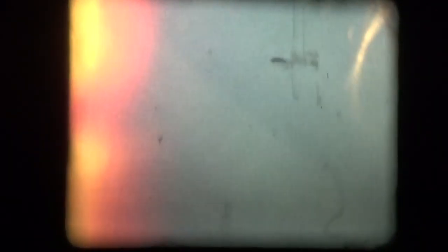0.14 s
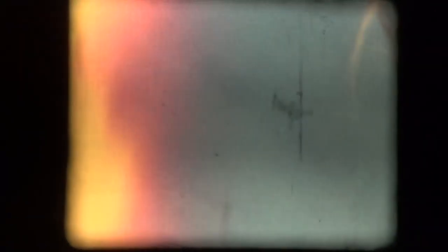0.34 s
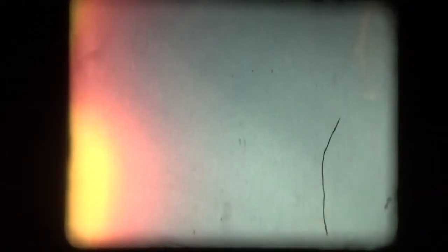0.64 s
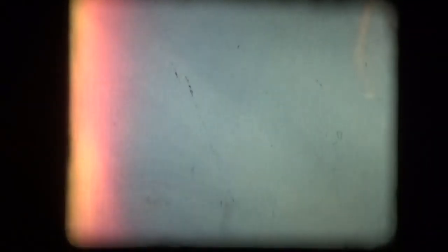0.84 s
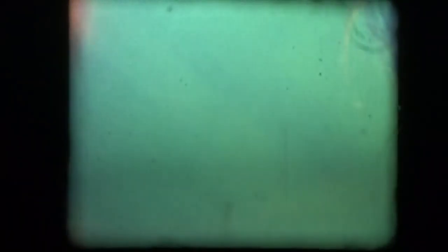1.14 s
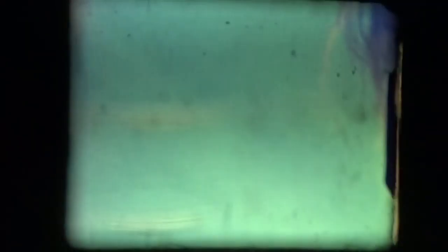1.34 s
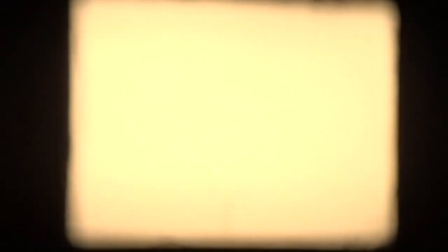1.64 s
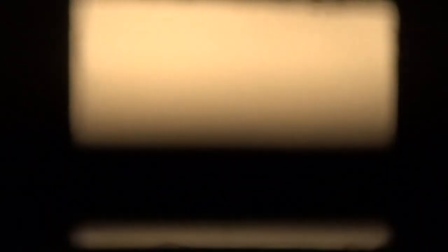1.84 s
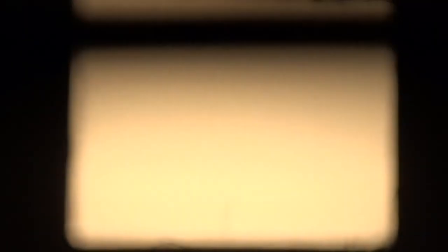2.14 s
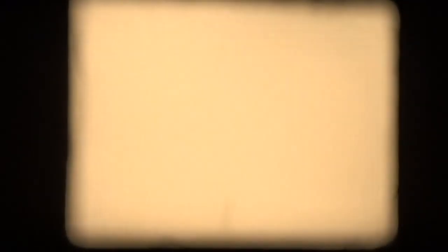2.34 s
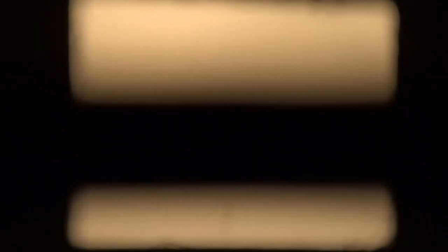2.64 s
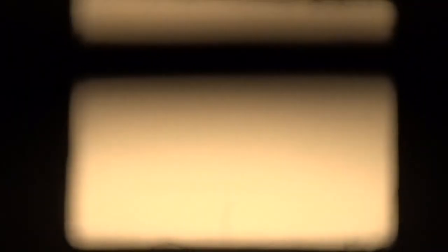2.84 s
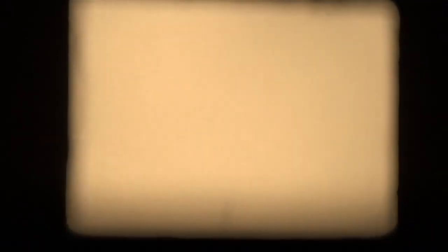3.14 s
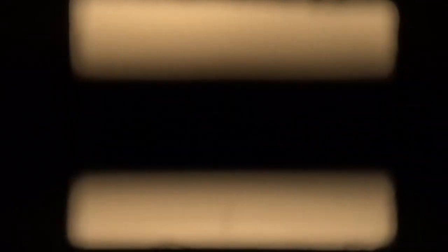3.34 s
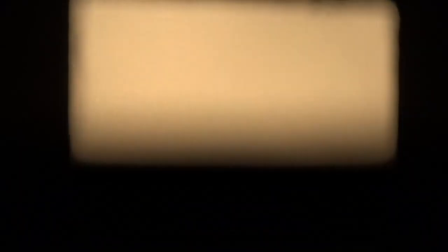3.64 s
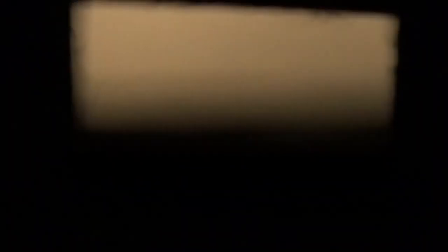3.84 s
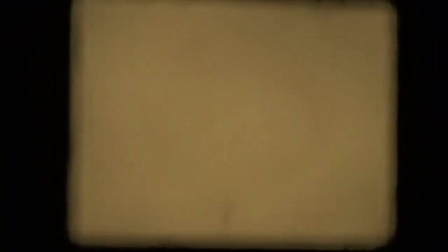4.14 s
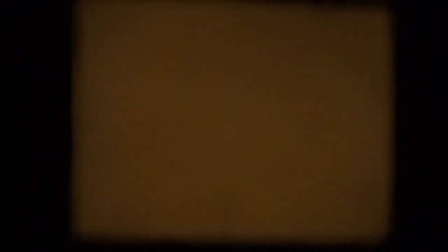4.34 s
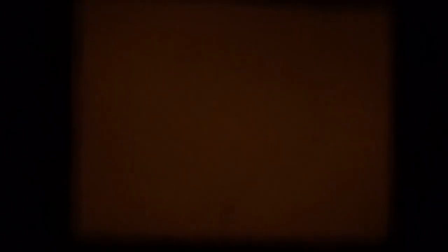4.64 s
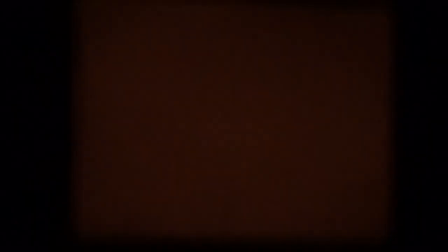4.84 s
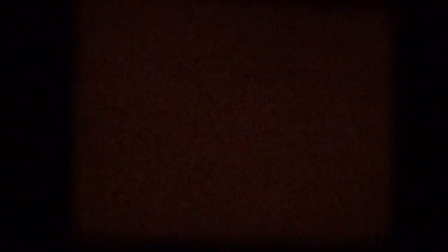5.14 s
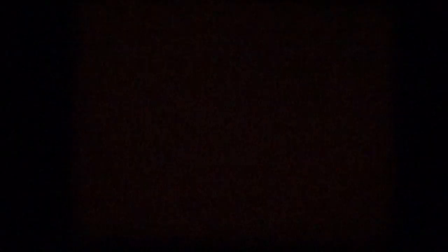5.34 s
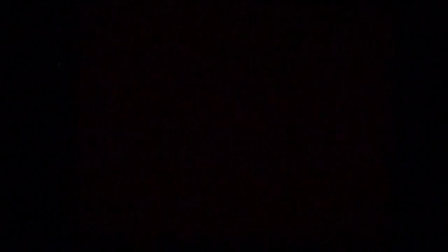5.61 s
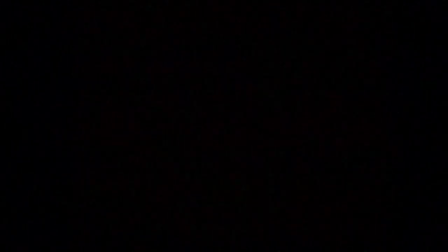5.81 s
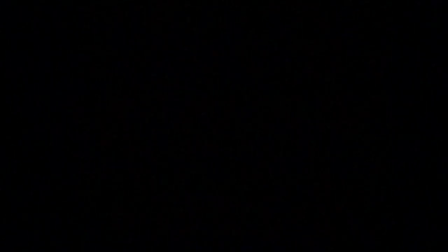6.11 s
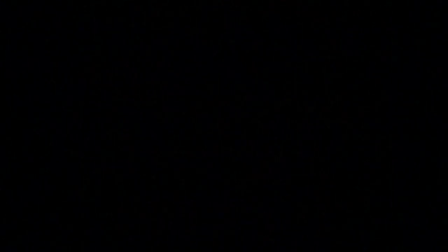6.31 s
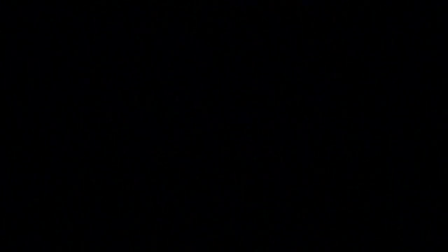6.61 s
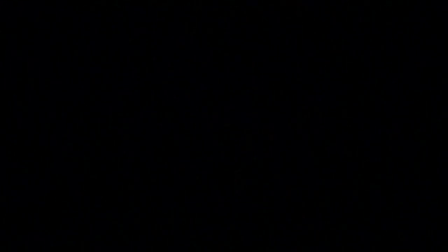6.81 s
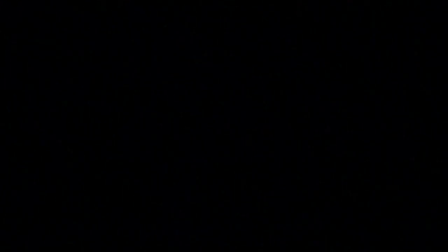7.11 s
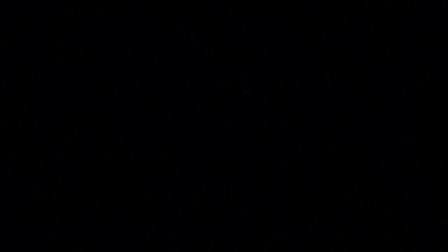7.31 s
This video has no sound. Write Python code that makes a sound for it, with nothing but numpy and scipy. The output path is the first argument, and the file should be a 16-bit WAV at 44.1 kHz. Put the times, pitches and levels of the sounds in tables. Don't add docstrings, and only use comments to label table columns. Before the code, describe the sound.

Steady mechanical roar with fast clicking, then small steel clinks and scrapes, a motor switched off and winding down, quiet rustling and close knocks.

```python
import sys
import numpy as np
from scipy import signal
from scipy.fft import rfft, irfft, next_fast_len
from scipy.io import wavfile
from scipy.ndimage import uniform_filter1d, map_coordinates

SR = 44100
rng = np.random.default_rng(int(sys.argv[2]) if len(sys.argv) > 2 else 0)


def level_to_linear(level):
    exponent = np.asarray(level, float) / 20
    return 10 ** exponent


def unload_wav(signal):
    wavfile.write(
        sys.argv[1],
        SR,
        np.round(np.clip(np.atleast_2d(signal).T, -1, 1) * 32767).astype(np.int16),
    )


N = 329427


def unit(x):
    return x / np.sqrt(np.mean(x ** 2) + 1e-20)


def curve(points, t):
    return np.interp(t, *np.transpose(points))


def along(points, hz):
    f, v = np.transpose(points)
    return np.interp(np.log(hz + 1), np.log(f + 1), v)


def between(start_s, end_s, fade_s):
    t = np.arange(N) / SR
    return np.clip(np.minimum(t - start_s, end_s - t) / fade_s, 0, 1)


def wobble(rate):
    steps = np.arange(0, N + 16, 16)
    knots = rng.standard_normal(int(N * rate / SR) + 4)
    return np.interp(np.arange(N), steps, map_coordinates(knots, [steps * rate / SR]))


def filtered(x, response):
    m = next_fast_len(N + 8192)
    return irfft(rfft(x, m) * response(np.fft.rfftfreq(m, 1 / SR)), m)[..., :N]


def shaped(response):
    return unit(filtered(rng.standard_normal(N), response))


def band(lo_hz, hi_hz):
    return shaped(lambda f: 1 / (1 + (lo_hz / (f + 1)) ** 8) / (1 + (f / hi_hz) ** 8))


def coloured(spectrum):
    return shaped(lambda f: level_to_linear(along(spectrum, f)))


def patchy(x, depth_db):
    z = signal.stft(x, nperseg=256)[2]
    field = uniform_filter1d(rng.standard_normal(z.shape), size=3, axis=0)
    field = uniform_filter1d(field, size=20, axis=1)
    return signal.istft(z * level_to_linear(depth_db * unit(field)), nperseg=256)[1][:N]


def swell_decay(t, db, rise_s, t60_s):
    return level_to_linear(db - 60 * np.maximum(t - rise_s, 0) / t60_s) * np.minimum(t / rise_s, 1)


def bursts(rows):
    env, t = np.zeros(N + SR), np.arange(SR // 3) / SR
    for s, db, rise_s, t60_s in rows:
        env[round(s * SR):][:len(t)] += swell_decay(t, db, max(rise_s, 2e-4), max(t60_s, 5e-3))
    return env[:N]


def ports(one, other):
    # f/Hz, left-right likeness
    alike = [(60, 0.17), (150, 0.907), (380, 0.94), (950, 0.903), (2380, 0.83), (5980, 0.8), (15000, 1)]
    # f/Hz, left minus right/dB
    left = [(60, -7.5), (180, -1), (550, -2.5), (1650, -1), (4970, -0.5), (15000, 0.5)]
    # f/Hz, left leads by/rad
    lead = [(0, 0.42), (780, 0.37), (2240, 0.164), (6550, 0.07), (6800, 0.3), (7750, 0.34), (15900, 0.0)]
    turn = lambda f: np.arccos(np.clip(along(alike, f), -1, 1)) / 2
    mid, side = filtered(np.array([one, other]), lambda f: np.array([np.cos(turn(f)), np.sin(turn(f))]))
    half = lambda f: level_to_linear(along(left, f) / 2) * np.exp(.5j * along(lead, f))
    return filtered(np.array([mid + side, mid - side]), lambda f: np.array([half(f), 1 / half(f)]))


def quiet_room():
    # f/Hz, density/dB per Hz
    spectrum = [(15, -38), (25, -21.5), (49, -1), (191, -11), (264, 3.5), (396, -13), (506, -4.5),
                (3860, -13), (11100, -14), (14900, -19), (16200, -17.5)]
    common_part = coloured(spectrum) * level_to_linear([[-.35], [.35]])
    pair = np.array([coloured(spectrum), coloured(spectrum)])
    unrelated = filtered(pair, lambda f: 1 / (1 + (f / 7000) ** 4))
    return level_to_linear(-59) * (coloured(spectrum) * 0 + common_part + level_to_linear(1.5) * unrelated * level_to_linear([[-.35], [.35]]))


def cloth():
    strokes = [(5.05, 1, 0.51, -52.5, -5), (5.28, -0.08, 0.022, -36, -17), (5.257, -0.25, 0.0203, -37, -15),
               (5.3, 0.2, 0.15, -57, -25.5), (5.87, .13, .09, -55, 6), (5.96, .09, .07, -53, 5),
               (6.2, .12, .16, -58, 0), (6.5, 0.28, .05, -59.5, 4.5), (6.67, 0.3, 0.057, -69.5, 8.5),
               (7.12, 0.1, 0.071, -50.5, -9), (7.279, .015, .01, -53, -8.5),
               (7.345, 0.0733, 0.065, -38, -9), (7.44, 0.02, .06, -44, -2)]
    # f/Hz, density/dB per Hz
    swish_spectrum = [(2940, -14.5), (5000, -4), (5440, -4.5), (8550, -3.5), (11000, 2), (12500, -1),
                      (14500, -10), (16200, -16)]
    # f/Hz, density/dB per Hz
    rub_spectrum = [(40, -50), (200, -6), (600, -7), (1150, -2.5), (1980, -1.5), (2890, -4.5), (8000, -19),
                    (10400, -52)]
    t = np.arange(N) / SR
    rub, swish = np.zeros(N), np.zeros(N)
    for s, swell_s, fade_s, db, swish_db in strokes:
        away = np.where(t < s, (s - t) / max(swell_s, .004), (t - s) / max(fade_s, .004))
        rub += level_to_linear(db - 10 * away ** 1.2)
        swish += level_to_linear(db + swish_db - 11.2 * away ** 1.4)
    fabric = swish * coloured(swish_spectrum) * level_to_linear(0.99 * wobble(55))
    fabric = fabric + rub * patchy(coloured(rub_spectrum), depth_db=2) * level_to_linear(1.71 * wobble(160))
    unsteady = level_to_linear(2.5 * wobble(30) + 2 * wobble(5))
    shuffle = level_to_linear(-65.5) * (t > 4.9) * band(lo_hz=99, hi_hz=456) * unsteady
    return fabric + shuffle


def knocks():
    # t/s, peak/dB, thud/dB, hardness/dB
    contacts = [(7.049, -16, -13, -6.5), (7.069, -31.5, -16.5, 0), (7.106, -39, -6, -6),
                (7.155, -22, -2.5, -24.5), (7.182, -29, -2, -1), (7.195, -38, -24.5, 6.5),
                (7.282, -21, -14, -9), (7.292, -20.5, -22.5, -16.5), (7.306, -27, -17, -10.5),
                (7.318, -26.5, -18, -15.5), (7.441, -19.5, -20, -20), (7.462, -30, -15.5, -1.5)]
    # f/Hz, width/Hz, level/dB
    shell_modes = [(987, 150, 16.5), (1420, 270, -13), (1586, 820, 5), (2345, 700, -13)]
    # t/s, level/dB, edge/dB
    hard_blows = [
        (7.0495, -1, 10),
        (7.157, -16.5, 0),
        (7.172, -2.5, -10),
        (7.2835, -14, -1.5),
        (7.294, -15, -5.5),
        (7.4415, -9, -0.5),
    ]

    def resonance(f, centre_hz, width_hz):
        return 1j * f * width_hz / (centre_hz * centre_hz - f * f + 1j * f * width_hz)

    def shell(f):
        return sum((-1) ** k * level_to_linear(db) * resonance(f, hz, w) for k, (hz, w, db) in enumerate(shell_modes))

    def part(heavy, hard, shift_db, life):
        return bursts([(s, db + heavy * thud_db + hard * hard_db + shift_db, .0007, 0.044 * life)
                       for s, db, thud_db, hard_db in contacts])

    body = part(0, 0, shift_db=-0.5, life=0.92) * shaped(shell)
    thud = part(0.96, 0, shift_db=-3.0, life=4.1) * band(lo_hz=110, hi_hz=520)
    snap = part(0, 0.9, shift_db=1.5, life=0.4) * band(lo_hz=2570, hi_hz=6970)
    tick = part(0, 1.36, shift_db=1.5, life=0.25) * band(lo_hz=6540, hi_hz=13440)
    impulses = np.zeros((2, N))
    for s, db, edge_db in hard_blows:
        impulses[:, round(s * SR)] = -level_to_linear([db - 8, db + edge_db])
    clack = filtered(impulses, lambda f: np.array([shell(f), resonance(f, 2200, 3000)])).sum(0)
    return clack + body + thud + snap + tick


def bumps():
    # t/s, level/dB, centre f/Hz, spread ratio, t60/s
    rows = [(3.867, -17, 2300, 1.63, 0.074), (4.337, -26.5, 3244, 1.1, 0.15),
            (5.023, -38, 1700, 1.5, 0.067), (5.023, -31, 4400, 1.1, 0.065),
            (5.022, -25, 8980, 0.92, 0.0566), (5.164, -28, 1355, 1.9, 0.089),
            (5.165, -36.5, 2170, 1.034, .13), (5.163, -38, 4530, 1.67, .042), (5.38, -46, 1490, 1.4, 0.082),
            (5.42, -50, 4340, 1.4, .08), (5.953, -42.5, 220, 2.26, 0.18), (6.005, -41.5, 254, 2.33, 0.093),
            (6.461, -41.5, 383, 2.2, 0.32), (6.463, -47.5, 1500, 3, 0.4), (6.466, -44, 2340, 1.1, 0.127),
            (7.170, -13, 637, 2.52, 0.066), (7.19, -45.5, 230, 2.96, 0.23), (7.292, -28.5, 186, 1.17, 0.19),
            (7.3, -50, 3470, 1.46, 0.343), (7.44, -41, 230, 2.8, 0.36), (6.462, -51, 110, 2.48, 0.33),
            (7.284, -36.5, 120, 1.9, 0.23), (7.053, -47, 130, 1.1, 0.16), (7.293, -26, 970, 1.2, 0.08),
            (7.294, -32, 2180, 0.98, .11), (7.294, -39.5, 3270, 1.04, 0.27),
            (7.35, -38.5, 1690, 1.08, 0.16), (7.34, -40, 950, 1.12, 0.213),
            (7.4402, -24, 1100, 1.45, 0.046), (7.441, -36, 2330, 1.12, .05), (7.442, -38, 3867, 0.87, .15),
            (7.462, -36, 2300, 1.3, .08), (5.164, -43.5, 6685, 0.88, .04), (5.277, -36, 1600, 1.2, .05)]
    out, t = np.zeros(N + SR), np.arange(SR // 3) / SR
    f = np.fft.rfftfreq(len(t), 1 / SR) + 1
    for s, db, hz, spread, t60_s in rows:
        colour = level_to_linear(-9 * (np.log(f / hz) / np.log(max(spread, 1.02))) ** 2)
        noise = unit(irfft(rfft(rng.standard_normal(len(t))) * colour, len(t)))
        out[round(s * SR):][:len(t)] += swell_decay(t, db, 0.027 * t60_s, t60_s) * noise
    return out[:N]


def carried_song():
    # t/s, level/dB
    song_db = [(3.42, -45), (3.524, -34), (3.546, -53), (4.442, -43), (4.526, -46), (4.664, -37),
               (4.722, -52.5), (4.756, -38), (4.93, -65.5)]
    t = np.arange(N) / SR
    level = level_to_linear(curve(song_db, t) - 2 + 3 * wobble(30)) * between(song_db[0][0], song_db[-1][0], .04)
    return level * np.sin(2 * np.pi * 4694 * t + .7 * wobble(40))


def jingle():
    # t/s, peak/dB, t60/s, weight of the part/dB
    taps = [(0.4814, -20.5, .045, -11), (0.5814, -28.5, 0.056, -17), (2.438, -10.5, 0.107, -16.5),
            (2.495, -29, .039, -24), (2.9882, -12, 0.05, -11), (3.145, -23, 0.07, -6.5),
            (3.2153, -18, 0.103, -10.5), (3.3932, -23, .04, -21), (3.4154, -23, 0.081, -3),
            (3.4272, -18, 0.24, -17), (3.472, -13, 0.11, -13), (3.4994, -33, 0.18, 2.5),
            (3.538, -23.5, 0.28, -4), (3.571, -12, 0.07, -13), (3.69, -20, 0.089, -8),
            (3.7863, -18, 0.046, -24), (3.8677, -17, 0.047, -8.5), (3.8894, -18, .049, -25),
            (3.955, -24, 0.025, 5.5), (3.975, -15, 0.071, -11), (4.053, -15, 0.037, -3),
            (4.1305, -22, 0.072, -15), (4.2197, -17.5, 0.029, -1), (4.261, -13, 0.0445, -1),
            (4.337, -11, 0.073, -21.5), (4.3546, -17, 0.047, -10), (4.457, -33, 0.028, -4.5),
            (4.61, -20, 0.072, -7.5), (4.7415, -14.5, 0.047, -12.5), (5.023, -20.5, 0.034, -7),
            (5.028, -24, 0.033, -10), (5.062, -39, .06, 0), (3.589, -24, .04, -15),
            (3.657, -23, 0.037, -15), (3.74, -34, .08, -8.5), (3.8149, -23, 0.036, -15),
            (3.834, -22, .04, -7), (3.995, -19, .04, -10), (4.01, -25, 0.032, -6.5),
            (4.1626, -25, .05, -12), (4.19, -25, .04, -10), (4.245, -26, .05, 1.5), (4.328, -18, .04, -25),
            (4.3751, -15.5, 0.048, -13), (4.425, -33, 0.035, -10.5), (4.644, -21, .05, -8)]
    # t/s, peak/dB, rise/s, t60/s, weight/dB
    scrapes = [(.002, -17.5, 0.0078, 0.238, -11.5), (.556, -11.5, 0.0175, 0.092, -17),
               (2.445, -22.5, 0.0132, 0.31, -22), (2.992, -25.5, 0.0078, 0.21, -30),
               (3.127, -15, 0.011, 0.061, -12.5), (3.225, -21, 0.0304, 0.56, -12.5),
               (3.58, -26, 0.014, 0.25, -2.5), (3.618, -20, 0.0106, 0.14, -6),
               (3.645, -17, 0.015, 0.102, -50), (3.808, -15.5, .019, 0.056, -5),
               (3.875, -28.5, .017, 0.048, 1), (3.985, -18, 0.0195, 0.051, -4),
               (4.15, -16, 0.025, 0.18, -6.5), (4.366, -15, 0.0275, 0.17, -6),
               (4.615, -17.5, 0.035, 0.12, -5.5), (4.748, -24.5, 0.038, 0.18, -5.5)]
    # f/Hz, level/dB, t60/s
    steel = [(3951, -3, .3), (4400, -4, .14), (4694, -8, .32), (4745, -4, .28), (5410, -3, .17),
             (6202, -10, .22), (7047, -7, .22), (7849, -7, .28), (8856, -4, .25), (9841, -2, .15),
             (10870, -4, .2), (11160, -8, .3), (11940, -1, .2), (13100, -6, .22), (14300, -6, .25),
             (15430, -10, .15)]
    # f/Hz, density/dB per Hz
    grit_spectrum = [(2940, -12.5), (5000, -89.5), (5640, -4), (7130, -1), (7480, -2), (8070, 0.5),
                     (10400, 5.5), (13700, 3), (15700, -5.5)]
    # t/s, ring over weight/dB
    free = [(3, -23), (3.5, -14), (4.05, -14), (4.3, -16), (4.75, -10), (5.02, -32)]
    # t/s, level/dB
    strikes = [(3.4994, -16), (3.575, -21), (3.69, -20), (3.8894, -19), (4.053, -13), (4.261, -17),
               (4.425, -21), (4.457, -21), (4.7415, -12)]
    # from/s, to/s, fade/s, level/dB
    handling = (3.5, 4.5, 0.5, -32.5)
    hits = [(s, db, 0.0039, t60_s, weight_db) for s, db, t60_s, weight_db in taps] + scrapes
    rattle = level_to_linear(handling[3] + 3.84 * wobble(25.02)) * between(*handling[:3])

    metal = lambda f: level_to_linear(sum(3.5 / (1 + ((f - hz) / 160) ** 2) for hz, _, _ in steel))
    grit = unit(level_to_linear(3 * wobble(300)) * filtered(coloured(grit_spectrum), metal))
    high = (bursts([(s, db - 6.5, rise_s, t60_s) for s, db, rise_s, t60_s, _ in hits]) + rattle) * grit

    clink = lambda f: level_to_linear(6.5 / (1 + ((f - 4400) / 256) ** 2))
    low = bursts([(s, db + weight_db - 7.0, rise_s, t60_s) for s, db, rise_s, t60_s, weight_db in hits])
    low = (low + level_to_linear(-5.5) * rattle) * unit(filtered(band(lo_hz=3060, hi_hz=7400), clink))

    push = bursts([(s, db + weight_db + curve(free, s) - 11 * (rise_s > .006), rise_s, t60_s)
                   for s, db, rise_s, t60_s, weight_db in hits]) * rng.standard_normal(N)
    push = patchy(level_to_linear(-4) * push + level_to_linear(-17) * rattle * rng.standard_normal(N), depth_db=2)
    struck = np.bincount([round(s * SR) for s, _ in strikes], [level_to_linear(db + 8) for _, db in strikes], N)
    t = np.arange(SR // 2) / SR
    modes = sum(level_to_linear(db - 24 - 60 * t / t60_s) * np.sin(2 * np.pi * hz * t) for hz, db, t60_s in steel)
    chatter = level_to_linear(3.5 * wobble(55))
    rings = signal.fftconvolve(struck + push, modes)[:N] * chatter
    return patchy(high + low, depth_db=2) + rings + carried_song()


def claw():
    # t/s, peak/dB, ring f/Hz
    pulls = [(0.0234, -27, 4270), (0.069, -28, 4720), (0.1205, -22, 4290), (0.1665, -25.5, 5500),
             (0.2159, -22.5, 5380), (0.2656, -19.5, 5380), (0.3132, -22, 5240), (0.363, -24.5, 4300),
             (0.413, -23, 3700), (0.4609, -26, 4320), (0.5102, -25, 4330), (0.5586, -24, 4210),
             (0.6078, -27, 4350), (0.6568, -24, 5380), (0.7073, -21.5, 5670), (0.7547, -25, 4350),
             (0.8046, -23.5, 4320), (0.8535, -26, 5070), (0.9024, -27, 4290), (0.9524, -27, 4990),
             (1.0016, -25.5, 5000), (1.051, -25, 5470), (1.1004, -21.5, 4210), (1.1503, -21.5, 4250),
             (1.1997, -19, 5350), (1.2476, -24, 5490), (1.299, -19.5, 3740), (1.3464, -27.5, 4250),
             (1.3932, -25, 4300), (1.4421, -25, 4310), (1.6874, -27, 3960)]
    # t/s, peak/dB
    slack = [(0, -15), (.27, -10.5), (.33, -14), (.5, -17.5), (.75, -11), (.84, -23), (1.22, -18),
             (1.45, -22.5), (1.69, -20.5)]
    # low f/Hz, high f/Hz
    slap_range_hz = (9500, 13800)
    times, peak_db, ring_hz = np.transpose(pulls)
    luck = rng.random((len(times), 2))
    slap_db = curve(slack, times) - (2 * luck[:, 0] - 1)
    pull_db = -27.5 + 1.1 * (peak_db - peak_db.mean())
    slap_env = bursts([(s, db - 11.0, .003, .035) for s, db in zip(times, slap_db)])
    pull_env = bursts([(s, db - 4, .0015, .03) for s, db in zip(times, pull_db)])
    ticks = slap_env * band(lo_hz=7100, hi_hz=15800) + pull_env * band(lo_hz=3520, hi_hz=5960)
    t = np.arange(SR // 20) / SR
    shape = level_to_linear(-60 * t / 0.029) * (1 - np.exp(-t / 0.00055))
    for s, slap, pull, hz, chance in zip(times, slap_db, pull_db, ring_hz, luck[:, 1]):
        slap_hz = np.interp(chance, (0, 1), slap_range_hz)
        rings = level_to_linear(slap - 12) * np.sin(2 * np.pi * slap_hz * t)
        rings = rings + level_to_linear(pull + 0.5 - 60 * t / 0.061) * np.sin(2 * np.pi * hz * t)
        ticks[round(s * SR):][:len(t)] += shape * rings
    return ticks


def motor():
    # f/Hz, density/dB per Hz
    case_spectrum = [(15, -61), (25, -80.5), (86, -18), (113, -11.5), (217, -10), (263, -9), (447, -3),
                     (587, -2.5), (862, -3), (1150, -6.5), (1500, -71), (2530, -120)]
    # f/Hz, density/dB per Hz
    gear_spectrum = [(650, -37), (1100, -5), (1350, -0.5), (1480, -6), (2090, -7.5), (2310, -8.5),
                     (2580, -12.5), (7000, -31), (9100, -51), (15400, -120)]
    # f/Hz, density/dB per Hz
    fan_spectrum = [(2940, -7), (5000, -4), (5450, -1), (6700, -5), (7480, -3), (8920, -1), (13000, -1),
                    (13900, -3.5), (15700, -11)]
    # f/Hz, width/Hz, lift/dB
    panel_modes = [(326, 30, 5), (369, 16, 5), (428, 18, 5), (457, 22, 7), (549, 20, 4), (648, 32, 7),
                   (775, 25, 3), (840, 45, 6), (908, 28, 4), (1022, 22, 6), (1290, 60, 3), (1386, 42, 8),
                   (1653, 30, 7), (2020, 35, 5), (2105, 70, 8), (2668, 45, 7), (3190, 45, 6), (4290, 90, 4),
                   (4700, 40, 4), (5470, 190, 3), (5930, 180, 3), (13900, 300, 4)]
    # f/Hz, width/Hz, lift/dB
    gaps = [(697, 83, -3), (1110, 65, -8.5), (1430.9, 76, -7), (1962, 92, -8), (2326, 93, -6),
            (3150, 20, 3.5)]
    # f/Hz, level/dB rms
    hum_lines = [(70.0, -50), (120.2, -35.5), (211.8, -36), (455.6, -29.5)]
    # t/s, motor shaking/dB
    drive = [
        (0, 0),
        (3.9, -0.2),
        (4.02, -3.5),
        (4.13, -0.3),
        (4.22, -3.5),
        (4.84, -17.5),
        (5.62, -38.5),
        (5.95, -46),
        (7.5, -60),
    ]
    # t/s, share of full shaft speed
    speed = [
        (4.15, 1),
        (4.45, .72),
        (5.9, .4),
    ]
    # t/s, depth/dB, hold/s
    ducks = [
        (2.438, -9.5, 0.026),
        (2.985, -9.5, 0.014),
    ]
    off_s, damped_s = 4.18, 3.43
    t = np.arange(N) / SR
    off = between(off_s, 9, 0.025)
    drive_db = curve(drive, t) + 1 * off * wobble(22.02)

    case = level_to_linear(-17.7423 + drive_db)
    gears = level_to_linear(-23 + 1.15 * drive_db - 3 * off - 0.1 * between(damped_s, 9, 0.52))
    fan = level_to_linear(-35.36 + 0.68 * drive_db)
    hum = level_to_linear(-32 + 0.6 * drive_db - 12.5 * off - 3.5 * between(damped_s, 9, 0.164))

    def panels(f):
        return level_to_linear(sum(db / (1 + (2 * (f - hz) / w) ** 2) for hz, w, db in panel_modes + gaps))

    def layer(spectrum, shake_db):
        return shaped(lambda f: level_to_linear(along(spectrum, f)) * panels(f)) * level_to_linear(shake_db * wobble(35))

    def roar():
        low = case * layer(case_spectrum, 0.51)
        return low + gears * layer(gear_spectrum, 0.31) + fan * layer(fan_spectrum, 0.84)

    turns = np.cumsum(curve(speed, t)) / SR
    lines = np.zeros(N)
    for hz, db in hum_lines:
        level = level_to_linear(db - hum_lines[1][1] + 1.6 * wobble(12))
        lines += level * np.sin(2 * np.pi * hz * turns + .55 * wobble(14))
    sound = ports(roar() + hum * lines, roar())
    gain_db = sum(db * ((t > s) & (t < s + hold_s)) for s, db, hold_s in ducks)
    boom = filtered(sound, lambda f: 1 / (1 + (f / 490) ** 4))
    damped = sound - 0.15 * between(damped_s, 9, 0.213) * boom
    return level_to_linear(uniform_filter1d(gain_db, size=130)) * damped


def reflections(near):
    t = np.arange(SR // 6) / SR
    tail = rng.standard_normal(len(t)) * level_to_linear(-60 * t / 0.006) * (t > .003)
    room = signal.fftconvolve(near, tail / np.linalg.norm(tail))[:N] * [[1], [-1]]
    return level_to_linear(-5.5) * filtered(room, lambda f: 1 / (1 + (f / 5000) ** 2) + 0.186)


def scene():
    near = claw() + jingle() + cloth() + knocks() + bumps()
    return motor() + near + reflections(near) + quiet_room()


def low_pass(x):
    return signal.sosfilt(signal.butter(12, 15950, fs=SR, output="sos"), x)


def record(dry):
    soft = dry / (1 + np.abs(dry / .7) ** 4) ** (1 / 4)
    return low_pass(filtered(soft, lambda f: f < 15800))


dry = scene()
out = record(dry)
unload_wav(out)
```